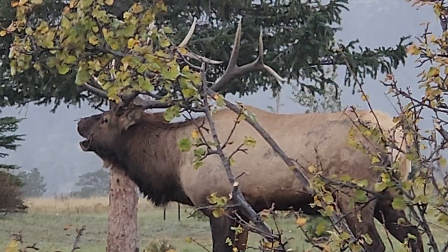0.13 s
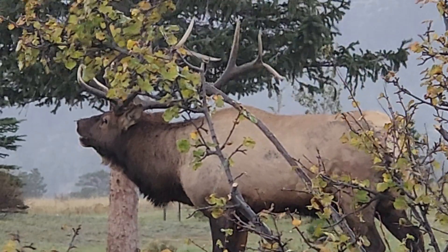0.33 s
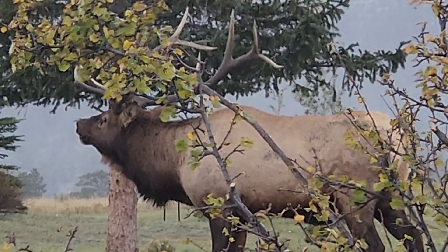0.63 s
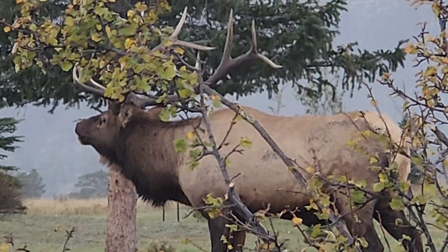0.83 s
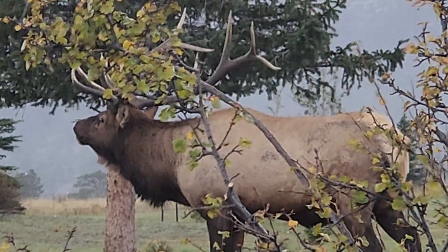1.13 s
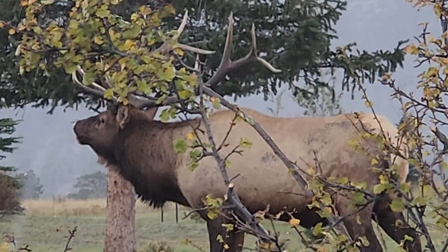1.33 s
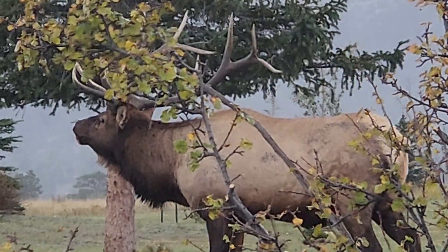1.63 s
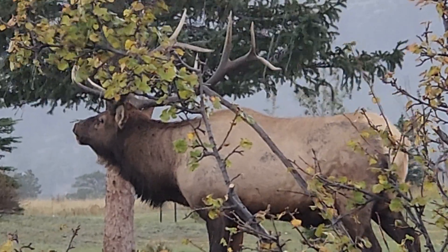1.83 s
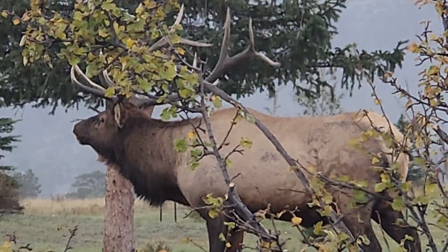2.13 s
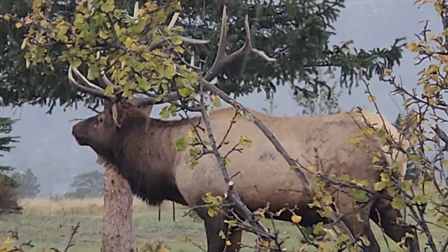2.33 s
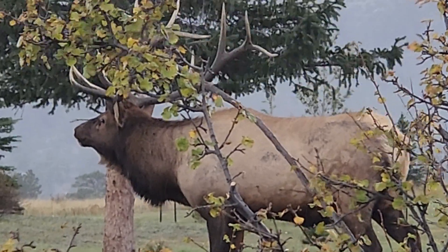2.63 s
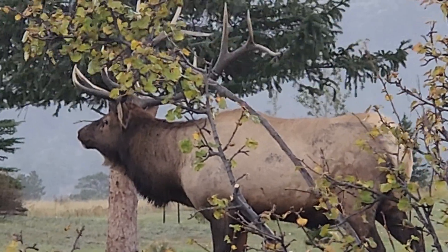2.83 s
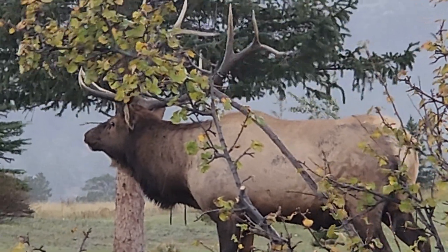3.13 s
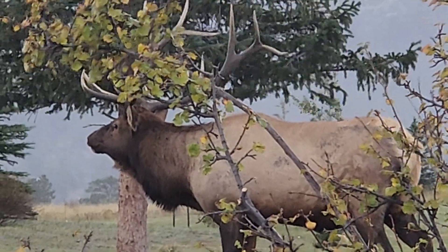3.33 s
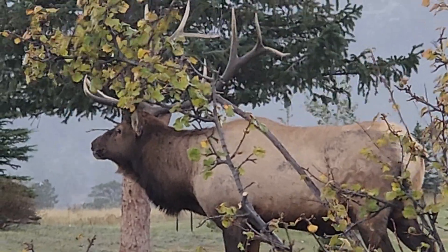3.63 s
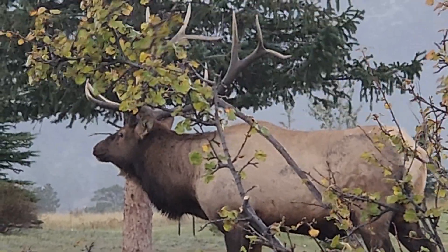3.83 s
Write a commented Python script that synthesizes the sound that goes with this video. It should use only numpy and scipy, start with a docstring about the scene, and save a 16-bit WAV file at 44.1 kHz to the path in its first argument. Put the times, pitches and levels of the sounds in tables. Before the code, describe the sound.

A bull elk's loud, piercing bugle is already sounding at 0 s, holds high briefly, roughens with a throaty growl, then steps steeply down and collapses by 0.3 s. A diffuse tree echo fades over the next second. Low wind rumbles and thumps on the microphone above faint, gradually softening outdoor hiss. Soft knocks come near 1.2 and 3.1 s, a crisp twig crackle at 2.15-2.35, and a sharp tick at 2.7.

```python
"""A loud whistle is heard first, already under way: a bull elk ends its bugle in a meadow.
The whistle, a tone with overtones, steps down through registers and collapses, while the vocal folds
growl far below it and modulate it into sidebands. Decaying noise scatters the call as the trees' echo.
Shaped noise makes the wind on the microphone and a faint outdoor hush; a hum and a far rush join them.
Excited resonances make a crackling twig, close ticks and soft knocks."""
import sys
import numpy as np
from scipy import signal
from scipy.fft import rfft, irfft
from scipy.io import wavfile
from scipy.ndimage import uniform_filter1d, minimum_filter1d, map_coordinates

SR = 44100
rng = np.random.default_rng(int(sys.argv[2]) if len(sys.argv) > 2 else 0)


def materialize(psi):
    """Save the field psi as 16-bit PCM at rate SR to the path in sys.argv[1].

    A 1-D psi becomes a single channel; in a 2-D psi each row is a channel.
    """
    bounded = np.clip(np.atleast_2d(psi).T, -1, 1)
    quanta = np.round(bounded * 32767).astype(np.int16)
    wavfile.write(sys.argv[1], SR, quanta)


N = 176400

# registers the whistle holds in turn: [start_s, end_s, first_pitch_hz, last_pitch_hz]
WHISTLE_REGISTERS = [(-.2, 0.009, 2222, 2345), (.009, 0.061, 2392, 2389), (.06, 0.108, 2240, 2296),
                     (0.111, .209, 2113, 2066), (.209, .235, 1923, 1728), (0.231, 0.256, 1492, 1468),
                     (0.251, 0.268, 1334, 1260), (0.259, 0.282, 1100, 860)]
REGISTER_ATTACK_S, REGISTER_RING_S = 0.0024, 0.0034  # time constants
# thin second whistle above the main one: [time_s, pitch_hz, level_db]
THIN_WHISTLE_PATH = [(0, 3115, -27), (.045, 3070, -33), (.095, 3053, -31), (.12, 2970, -35),
                     (.14, 2940, -75)]
# effort of the call: [time_s, whistle_level_db, fold_grip_depth (0-1), overtone_level_db re whistle]
CALL_EFFORT = [(0, -6.5, 0.03, -35), (.035, -3.5, 0.04, -38), (.065, -4.5, 0.19, -42.5),
               (.109, -5, 0, -36.5), (.124, -8.5, 0.6, -14), (.16, -10, 0.3, -14), (.197, -7, 0.54, -20),
               (.22, -7.5, 0, -32.5), (.25, -17, 0, -31.5), (.266, -30.5, 1, -31), (.295, -50, 1, -32)]
# vocal folds: [time_s, pitch_hz, fundamental_level_db, throat_harmonics_level_db]
FOLD_PATH = [(0, 179.8, -24, -26), (.06, 179.7, -46.5, -29), (.11, 177.1, -22.5, -29),
             (.16, 180.9, -36.5, -27.5), (.22, 175.6, -21.5, -29), (.25, 163.4, -32, -20),
             (.28, 151.8, -31, -31), (.305, 147.3, -69, -47.5)]
# throat resonances, each used twice in cascade: [centre_hz, single_stage_width_hz, level_db]
THROAT_RESONANCES = [(660, 350, -8.5), (972, 140, -5), (1260, 120, -3), (1444, 35, 7.5), (1853, 95, 1),
                     (2310, 150, 5), (3060, 400, -11)]
# whistle overtones: [multiple, level_db re overtone level]
WHISTLE_OVERTONES = [(2, 0.5), (3, -17), (4, -27), (5, -38), (6, -45.5)]
# rasp of air in the throat: [time_s, level_db]
RASP_LEVEL = [(0, -37.5), (.1, -35), (.2, -34.5), (.24, -28.5), (.266, -25.5), (.282, -40), (.32, -72)]
# spectrum of the hiss at the lips: [frequency_hz, density_db per Hz, relative]
LIP_SPECTRUM = [(500, -24), (2250, 8), (2800, -2.5), (3600, -11), (4600, -10.5), (5400, -8), (5850, -21),
                (6300, -4.5), (6900, -46.5), (7900, -14), (9000, -41.5), (15000, -55)]
# air at the lips: [time_s, level_db re whistle]
LIP_AIR_LEVEL = [(0, -20.5), (.105, -19.5), (.13, -22), (.21, -27.5), (.26, -30)]
# spread of pitch as a fraction; the collapse values are added gradually from COLLAPSE_S on
WHISTLE_JITTER, COLLAPSE_JITTER = 0.0029, 0.0082
FOLD_JITTER, FOLD_COLLAPSE_JITTER = 0.005, 0.038
COLLAPSE_S = 0.16
GRIP_SWING_RAD, GRIP_LEAD_RAD = 0.12, 0.36  # phase swing at full grip and its phase lead
GRIP_SECOND = 0.27  # second harmonic of the grip, relative to the first
LEAD_S = .25  # the call starts this long before the scene
# the call across two microphone ports: [frequency_hz, left_lead_rad, left_minus_right_db]
PORT_DIFFERENCES = [(100, 0, -3.5), (1300, 0.77, -2.5), (1810, 1.07, 6), (2250, 0.47, -1.3), (3120, 2, 5.5),
                    (4200, 1.16, 2.5), (6130, 2, -5), (15000, 6.5, -4.5)]
NEAR_DB, NEAR_T60_S = -13.5, 0.13
TREES_DB, TREES_T60_S, TREES_DELAY_S, TREES_RISE_S = -25, 1.41, 0.039, 0.082
# colour of the echo: [frequency_hz, relative_level_db]
ECHO_COLOUR = [(100, -3.5), (1400, -10.5), (2080, -4.5), (2400, -8), (3200, -11.5), (4300, -9.5),
               (9000, -7.5)]
# early reflections from the ground and near trunks: [delay_s, level_db, left_minus_right_db]
EARLY_REFLECTIONS = [(.011, -30.5, -2), (.026, -22, -1), (.05, -21.5, 0.5)]
# smeared returns from far stands of trees: [delay_s, level_db]
FAR_RETURNS = [(.19, -49), (0.344, -35), (0.689, -42)]
RETURN_T60_S = 0.47
# spectrum of wind on the microphone: [frequency_hz, density_db per Hz, relative]
WIND_SPECTRUM = [(15, -15), (28, 4), (45, 7.5), (65, 9), (95, 7), (130, -1.5), (200, -9), (300, -38.5),
                 (600, -60)]
# level of the wind before its flutter: [time_s, level_db]
WIND_COURSE = [(0, -30), (.35, -35.5), (.65, -31), (1.1, -31), (1.3, -36.5), (1.48, -30), (1.72, -30.5),
               (1.85, -24), (2.1, -35.5), (2.28, -28), (2.4, -38.5), (2.55, -28), (2.85, -32), (3.05, -27),
               (3.35, -29.5), (3.6, -34), (4, -28)]
WIND_SIDE_DB = -12  # left-right difference part, re common part
# buffets on the microphone: [time_s, peak_db, pitch_hz, length_s]
WIND_BUFFETS = [(0.506, -16, 44.3, 0.032), (0.896, -14, 43, 0.013), (1.043, -21.5, 93, 0.018),
                (1.471, -25, 106.5, 0.032), (2.554, -25.5, 72, .018), (2.988, -17.5, 65.4, 0.024),
                (3.09, -25.5, 173.5, 0.019), (3.391, -21, 78.4, 0.013)]
# spectrum of the outdoor hush: [frequency_hz, density_db per Hz, relative]
HUSH_SPECTRUM = [(100, -0.5), (200, -0.5), (400, -4.5), (650, -5.5), (950, -10.5), (1500, -10),
                 (2100, -11.5), (2700, -19.5), (3300, -23), (4300, -26.5), (5000, -33), (5800, -59.5),
                 (9000, -52)]
# spectrum of the leafy hiss: [frequency_hz, density_db per Hz, relative]
HISS_SPECTRUM = [(3000, -31), (5000, -10), (5800, -9.5), (7500, -5), (9500, -9.5), (11500, -13),
                 (14000, -10.5), (16000, -21)]
HISS_DB = -67.5  # before the treble level and wandering
# likeness of the hush left and right: [frequency_hz, correlation]
HUSH_LIKENESS = [(100, 0.98), (300, 0.87), (650, 0.73), (1400, 0), (2200, 0.23), (6000, 0.16),
                 (15000, 0.05)]
# level of the hush before its wandering: [time_s, level_db]
HUSH_COURSE = [(0, -36.5), (1, -40), (2, -40), (2.6, -39.5), (3.02, -39.5), (3.14, -39), (3.45, -40),
               (4, -39)]
# gain on the upper hush and the hiss: [time_s, gain_db]
TREBLE_GAIN = [(0, 9.5), (.55, 7), (.9, 4.5), (1.15, 7.5), (1.4, 3.5), (2.05, 6), (2.5, 3.5), (3.1, 0),
               (4, 0.5)]
# faint far hum before its wandering: [pitch_hz, peak_db]
FAR_HUM = [(286, -49), (334, -50.5)]
# spectrum of the far rush from the left: [frequency_hz, density_db per Hz, relative]
RUSH_SPECTRUM = [(200, -17), (500, -5.5), (1200, 1.5), (2100, -1.5), (3000, -14.5), (4500, -17),
                 (5800, -41.5), (9000, -50.5)]
RUSH_DB, RUSH_PAN_DB, RUSH_LAG_S = -48.5, 2.5, 0.00041
# soft knocks: [time_s, peak_db, pitch_ratio]
KNOCK_EVENTS = [(1.181, -23.5, 1), (2.841, -32.5, 1), (3.084, -23, 0.83), (3.18, -30, 0.82), (3.36, -28, 1)]
# knock colour at pitch ratio 1: [frequency_hz, relative_level_db]
KNOCK_COLOUR = [(80, 2), (200, 1.5), (340, 6.5), (600, -8.5), (1000, -21), (3000, -50)]
KNOCK_T60_S = 0.032
# twig cracks, before panning: [time_s, peak_db, pitch_ratio]
TWIG_CRACKS = [(2.149, -25.5, 1.1), (2.173, -25, 0.81), (2.179, -15, 1.15), (2.1845, -15.5, 1.06),
               (2.19, -30, 1.1), (2.1942, -12, 1.04), (2.202, -25, 0.8), (2.208, -30, 1.3),
               (2.2215, -25, 1.3), (2.2295, -23, 0.81), (2.2505, -26, 1.07), (2.254, -29, 1.77),
               (2.258, -22, 0.86), (2.268, -27.5, 0.87), (2.284, -29, 0.86), (2.303, -36.5, 2.1),
               (2.3184, -29, 0.86), (2.323, -24.5, 0.9), (2.3573, -31.5, 0.72)]
# twig colour at pitch ratio 1: [frequency_hz, relative_level_db]
TWIG_COLOUR = [(400, -30), (1000, -3.5), (1450, 10.5), (1950, 8.5), (2600, -.5), (3300, -6), (5000, -19),
               (9000, -23), (15000, -32)]
CRACK_T60_S, TWIG_ECHO_DB, TWIG_ECHO_T60_S = 0.011, -11.5, .5
# splinters after the break: start, time constant of their delays, level at the start, fall
SPLINTER_START_S, SPLINTER_SPREAD_S, SPLINTER_DB, SPLINTER_DB_PER_S = 2.2, 0.062, -31, -35
# close ticks, before panning: [time_s, peak_db, pitch_ratio]
TICK_EVENTS = [(2.7005, -19.5, 1), (3.487, -39, 0.63), (3.6, -38, 0.9)]
# tick colour at pitch ratio 1: [frequency_hz, relative_level_db]
TICK_COLOUR = [(500, -21), (1100, -25), (1450, 14), (1900, -6), (2700, -3), (4200, -15), (4900, 3),
               (5600, -12), (7500, -18), (10000, -15), (13500, -15), (16000, -21)]
TICK_T60_S, TICK_TAIL_DB, TICK_TAIL_T60_S = 0.0052, -10, 0.12
TOP_HZ = 15850
CEILING, LIMITER_S = .98, .004  # limiter threshold (full scale 1) and smoothing time


def undb(db):
    """Logarithmic level: decibels to amplitude gain."""
    return 10 ** (np.asarray(db) / 20)


def curve(table, t, axis=1):
    """Linear interpolation: one column of a table, joined by straight lines."""
    rows = np.array(table, float)
    return np.interp(t, rows[:, 0], rows[:, axis])


def over_hz(table, size, axis=1):
    """Logarithmic frequency: a table read at the bins of a signal of this size."""
    rows = np.array(table, float)
    bins_hz = np.arange(size // 2 + 1) * SR / size
    return np.interp(np.log(bins_hz + 1), np.log(rows[:, 0]), rows[:, axis])


def unit(x):
    """Normalisation: scale to rms 1."""
    return x / np.sqrt(np.mean(x ** 2))


def noise(colour, size):
    """Spectral shaping: white noise filtered to a given spectrum, rms 1."""
    spectrum = rfft(rng.standard_normal(size))
    return unit(irfft(spectrum * undb(over_hz(colour, size)), size))


def walk(rate_hz, size):
    """Slow modulation: random points at a given rate, smoothly joined, spread near 1."""
    at = np.arange(size) * rate_hz / SR
    return map_coordinates(rng.standard_normal(4096), [at], order=2, mode="mirror")


def phase_of(pitch_hz):
    """Instantaneous frequency: phase in radians is its running sum."""
    return 2 * np.pi * np.cumsum(pitch_hz) / SR


def swell(t, start, end, attack, release):
    """Exponential build-up and decay: rises at the start, holds, rings out after the end."""
    rise = 1 - np.exp(-np.maximum(t - start, 0) / attack)
    return rise * np.exp(-np.maximum(t - end, 0) / release)


def throat(x):
    """Resonance: parallel formants, each squared for steep flanks."""
    f = np.arange(len(x) // 2 + 1) * SR / len(x) + 1
    response = 0
    for hz, width, db in THROAT_RESONANCES:
        response = response + undb(db) / (1 + 1j * (f / hz - hz / f) * hz / width) ** 2
    return irfft(rfft(x) * response, len(x))


def echo(x, t60, colour, delay=0., rise=0.0055):
    """Diffuse scattering: convolution with decaying noise, unrelated left and right."""
    size = 2 * SR
    age = np.maximum(np.arange(size) / SR - delay, 0)
    shape = (1 - np.exp(-age / rise)) * np.exp(-np.log(1000) * age / t60)
    sides = []
    for _ in range(2):
        response = unit(shape * noise(colour, size))
        sides.append(signal.fftconvolve(x, response)[:len(x)])
    return np.array(sides) / np.sqrt(size)


def placed(x, pan_db, lag_s):
    """Interaural level and time difference: positive values favour the left."""
    late = map_coordinates(x, [np.arange(N) - lag_s * SR], order=3)
    return np.array([x * undb(pan_db / 2), late * undb(-pan_db / 2)])


def whistle_sound(t, fold, waver):
    """Amplitude and phase modulation: the folds shake a tone that breaks between registers."""
    level_db, grip, bright_db = [curve(CALL_EFFORT, t, axis=column) for column in (1, 2, 3)]
    shake = 1 + grip * (np.cos(fold) + GRIP_SECOND * np.cos(2 * fold))
    overtone_shake = 1 + .35 * grip * np.cos(fold)
    phase_swing = GRIP_SWING_RAD * grip * np.sin(fold + GRIP_LEAD_RAD)
    whistle = undb(curve(LIP_AIR_LEVEL, t)) * noise(LIP_SPECTRUM, len(t))
    for start, end, first_hz, last_hz in WHISTLE_REGISTERS:
        pitch = np.interp(t, [start, end], [first_hz, last_hz]) * waver
        phase = phase_of(pitch) + phase_swing
        overtones = undb(bright_db) * sum(undb(db) * np.sin(round(k) * phase) for k, db in WHISTLE_OVERTONES)
        tone = shake * np.sin(phase) + overtone_shake * overtones
        envelope = swell(t, start, end, REGISTER_ATTACK_S, REGISTER_RING_S)
        whistle = whistle + np.sqrt(2) * envelope * tone
    return undb(level_db) * whistle


def thin_whistle(t, waver):
    """Simple oscillation: a faint second sine shares the whistle's pitch wavering."""
    tone = np.sqrt(2) * np.sin(phase_of(curve(THIN_WHISTLE_PATH, t) * waver))
    return undb(curve(THIN_WHISTLE_PATH, t, axis=2)) * tone


def fold_growl(t, fold):
    """Source and filter: a fold fundamental, with higher harmonics through the throat."""
    fundamental = undb(curve(FOLD_PATH, t, axis=2)) * np.sqrt(2) * np.sin(fold)
    pulses = sum(np.cos(k * fold) for k in range(2, 24))
    return fundamental + undb(curve(FOLD_PATH, t, axis=3)) * unit(throat(pulses))


def throat_rasp(t, fold):
    """Turbulence: noise pulsing with the folds is filtered by the throat."""
    air = rng.standard_normal(len(t)) * (1 + 0.32 * np.cos(fold))
    return undb(curve(RASP_LEVEL, t)) * unit(throat(air))


def elk(t):
    """Coupled oscillators: the folds growl through the throat and shake the whistle."""
    size = len(t)
    slack = np.clip((t - COLLAPSE_S) / 0.057, 0, 1)
    fold_waver = 1 + (FOLD_JITTER + FOLD_COLLAPSE_JITTER * slack) * walk(170, size)
    fold = phase_of(curve(FOLD_PATH, t) * fold_waver)
    waver = 1 + (WHISTLE_JITTER + COLLAPSE_JITTER * slack) * walk(400, size)
    call = whistle_sound(t, fold, waver) + thin_whistle(t, waver)
    call = call + fold_growl(t, fold) + throat_rasp(t, fold)
    return call * np.clip((RASP_LEVEL[-1][0] - t) / 0.033, 0, 1)


def bugle():
    """Superposition of paths: direct call, early reflections, near scatter and tree echoes."""
    lead = int(LEAD_S * SR)
    size = N + lead
    t = (np.arange(size) - lead) / SR
    call = elk(t) * np.clip((t + LEAD_S) / LEAD_S, 0, 1)
    turn, pan_db = over_hz(PORT_DIFFERENCES, size), over_hz(PORT_DIFFERENCES, size, axis=2)
    spectrum = rfft(call)
    direct = np.array([irfft(spectrum * np.exp(.5j * s * turn) * undb(s * pan_db / 2), size)
                       for s in (1, -1)])
    early = 0
    for delay, db, pan in EARLY_REFLECTIONS:
        side_db = db + np.array([[pan], [-pan]]) / 2
        early = early + undb(side_db) * np.roll(call, int(delay * SR))
    near = undb(NEAR_DB) * echo(call, NEAR_T60_S, ECHO_COLOUR)
    far = undb(TREES_DB) * echo(call, TREES_T60_S, ECHO_COLOUR, TREES_DELAY_S, TREES_RISE_S)
    returns = sum(undb(db) * echo(call, RETURN_T60_S, ECHO_COLOUR, delay) for delay, db in FAR_RETURNS)
    return (direct + early + near + far + returns)[:, lead:]


def wind(t):
    """Turbulent pressure: eddies rumble as low noise; sine bursts make the buffets."""
    mid, side = noise(WIND_SPECTRUM, N), noise(WIND_SPECTRUM, N)
    stereo = mid + undb(WIND_SIDE_DB) * side * np.array([[1], [-1]])
    flutter_db = 2.5 * walk(16, N)
    out = undb(curve(WIND_COURSE, t) + flutter_db) * stereo
    for at, db, hz, length in WIND_BUFFETS:
        envelope = np.exp(-((t - at) / length) ** 2)
        out = out + undb(db) * envelope * np.sin(2 * np.pi * (hz * (t - at) + rng.random()))
    return out


def far_hum():
    """Random modulation: faint sines wander in level and pitch."""
    hum = 0
    for hz, db in FAR_HUM:
        tone = np.sin(phase_of(hz * (1 + 0.01098 * walk(10, N))))
        hum = hum + undb(db + 2.83 * walk(6.08, N)) * tone
    return hum


def far_rush():
    """Directional cues: shaped noise is louder and earlier on the left."""
    rush = undb(RUSH_DB + 0.72 * walk(3, N)) * noise(RUSH_SPECTRUM, N)
    return placed(rush, RUSH_PAN_DB, RUSH_LAG_S)


def meadow(t):
    """Partial coherence: stereo hush and an easing leafy hiss, with the far hum and rush."""
    like = np.clip(over_hz(HUSH_LIKENESS, N), -1, 1)
    mid, side = (irfft(rfft(noise(HUSH_SPECTRUM, N)) * np.sqrt((1 + s * like) / 2), N) for s in (1, -1))
    hush = undb(curve(HUSH_COURSE, t) + 0.27 * walk(5.38, N)) * np.array([mid + side, mid - side])
    high = signal.sosfiltfilt(signal.butter(2, 2300, "high", fs=SR, output="sos"), hush)
    hiss = undb(HISS_DB + 0.55 * walk(19, N)) * np.array([noise(HISS_SPECTRUM, N), noise(HISS_SPECTRUM, N)])
    pan_db = np.array([[3], [-3]]) / 2  # the upper hush leans left
    treble = (high * undb(pan_db) + hiss) * undb(curve(TREBLE_GAIN, t))
    return hush - high + treble + far_hum() + far_rush()


def snaps(events, colour, t60):
    """Impulse response: a click and a short noise burst excite an object's resonances."""
    size = 8192
    out, age = np.zeros(N + size), np.arange(size) / SR
    for at, db, ratio in events:
        shifted = [(hz * ratio, gain) for hz, gain in colour]
        # folding the cepstrum gives a minimum-phase ring, with its energy at the start
        cepstrum = irfft(np.log(undb(over_hz(shifted, size))), size)
        ring = irfft(np.exp(rfft(2 * cepstrum * (np.arange(size) < size // 2))), size)
        burst = (age == 0) + 0.09 * rng.standard_normal(size) * np.exp(-np.log(1000) * age / t60)
        sound = signal.fftconvolve(burst, ring)[:size]
        start = int(at * SR)
        out[start:start + size] += undb(db) * sound / np.abs(sound).max()
    return out[:N]


def knocks():
    """Damped resonance: soft low knocks in the middle."""
    return snaps(KNOCK_EVENTS, KNOCK_COLOUR, KNOCK_T60_S)


def splinters(count=16):
    """Exponential waiting times: random cracks thin out; rows (time_s, peak_db, pitch_ratio)."""
    chance = rng.random((count, 3))
    age = -SPLINTER_SPREAD_S * np.log(1 - .98 * chance[:, 0])
    scatter_db = 7 * (chance[:, 1] - .5)
    scatter_octaves = .8 * (chance[:, 2] - .4)
    peak_db = SPLINTER_DB + SPLINTER_DB_PER_S * age + scatter_db
    return zip(SPLINTER_START_S + age, peak_db, 2 ** scatter_octaves)


def twig_break():
    """Brittle fracture: cracks and splinters ring the twig and scatter diffusely."""
    twig = snaps([*TWIG_CRACKS, *splinters()], TWIG_COLOUR, CRACK_T60_S)
    echo_colour = [(300, 5), (1600, 11.5), (3000, 0), (9000, -9)]  # frequency_hz, level_db
    scatter = undb(TWIG_ECHO_DB) * echo(twig, TWIG_ECHO_T60_S, echo_colour)
    return placed(twig, pan_db=3.0, lag_s=.00005) + scatter


def ticks():
    """Impulsive excitation: close ticks on the right, each with a brief diffuse tail."""
    tick = snaps(TICK_EVENTS, TICK_COLOUR, TICK_T60_S)
    tail_colour = [(1500, 0), (5000, 0), (7000, -15)]  # frequency_hz, level_db
    tail = undb(TICK_TAIL_DB) * echo(tick, TICK_TAIL_T60_S, tail_colour)
    return placed(tick, pan_db=-7, lag_s=.00002) + tail


def scene():
    """Superposition: the elk, wind, meadow and small close sounds add together."""
    t = np.arange(N) / SR
    return bugle() + wind(t) + meadow(t) + knocks() + twig_break() + ticks()


def record(dry):
    """Peak limiting and band limiting: fast gain control, then a low-pass cut."""
    size = int(LIMITER_S * SR)
    room = np.minimum(1, CEILING / np.abs(dry).max(axis=0))
    gain = uniform_filter1d(minimum_filter1d(room, 2 * size), size)
    low_pass = signal.ellip(8, .05, 50, TOP_HZ, fs=SR, output="sos")
    return signal.sosfiltfilt(low_pass, dry * gain)


dry = scene()
out = record(dry)
materialize(out)
```